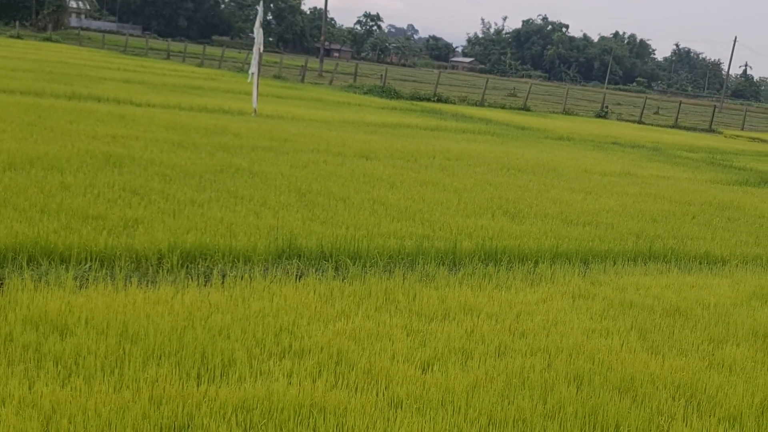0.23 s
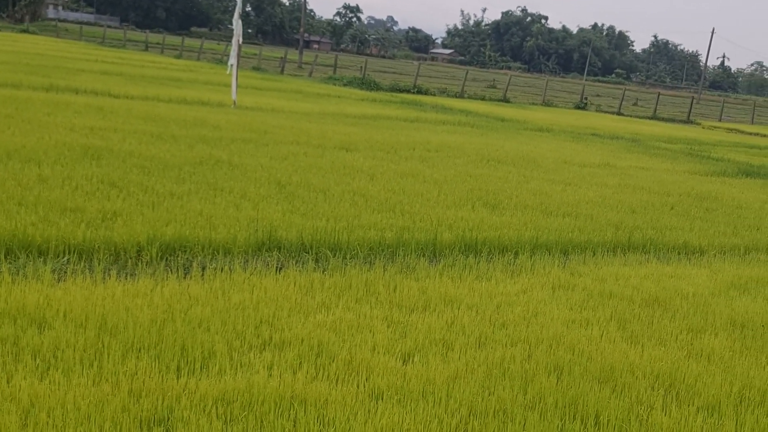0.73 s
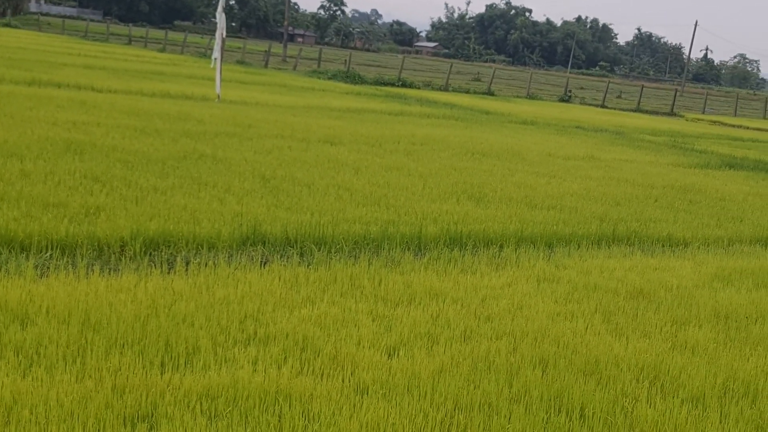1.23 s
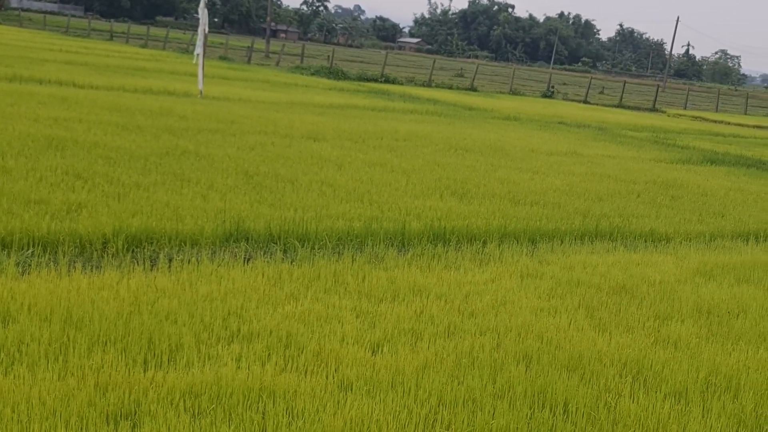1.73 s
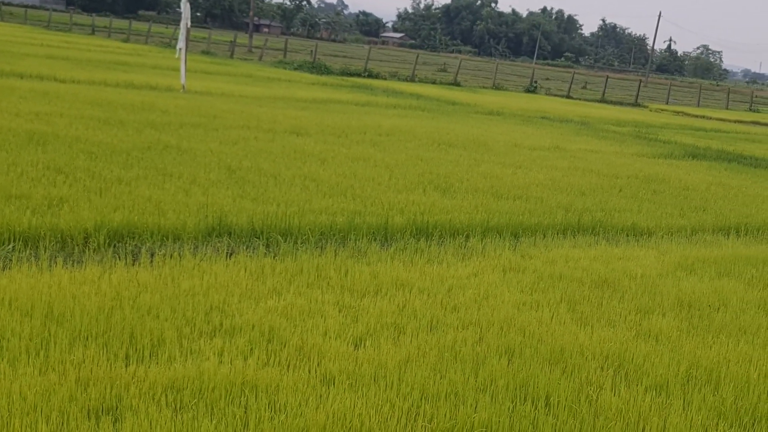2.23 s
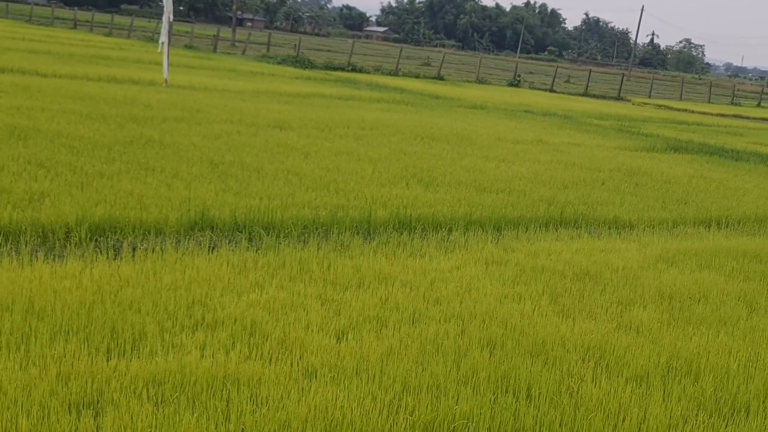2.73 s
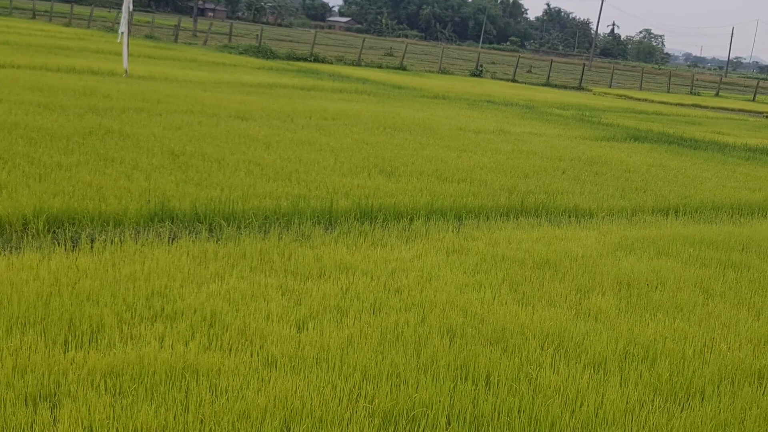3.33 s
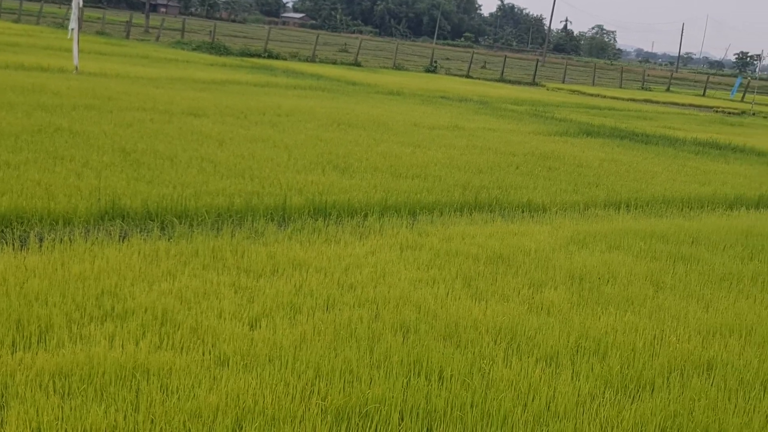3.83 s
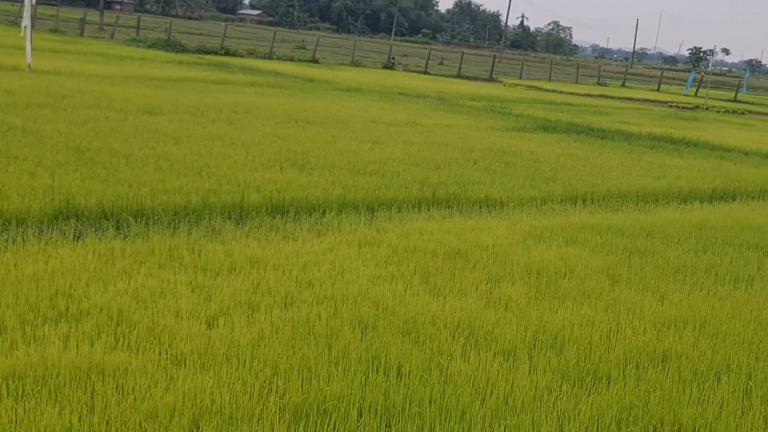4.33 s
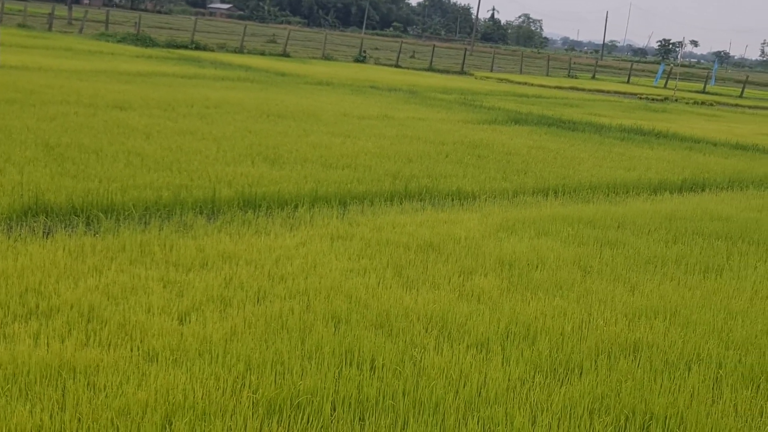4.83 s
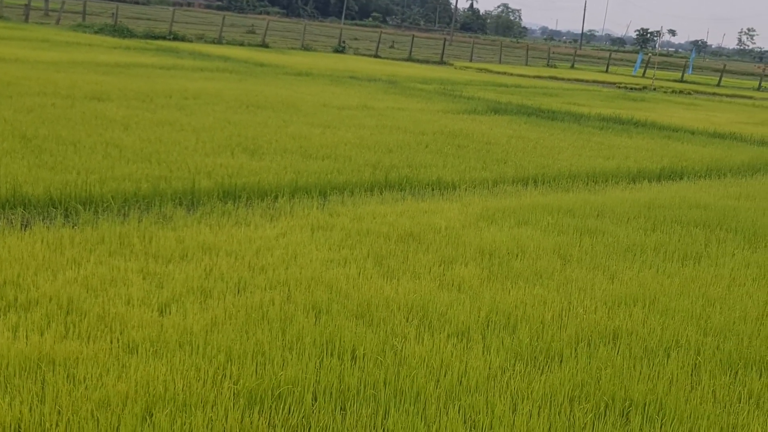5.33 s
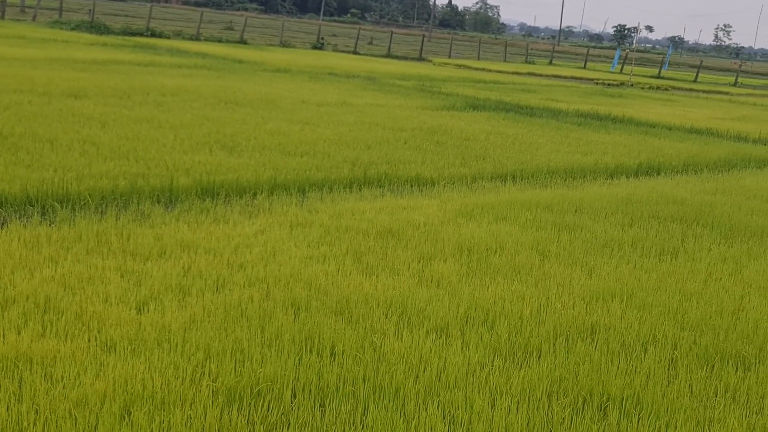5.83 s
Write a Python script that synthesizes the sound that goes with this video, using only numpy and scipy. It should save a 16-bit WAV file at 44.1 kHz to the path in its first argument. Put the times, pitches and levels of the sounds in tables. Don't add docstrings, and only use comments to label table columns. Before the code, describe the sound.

A calm outdoor rice field, with soft air rumble and faint hiss. Throughout, a far pump engine hums very low, wavering and stumbling briefly near 1.7 and 4.2 seconds. A dense distant cricket chorus trills steadily around a high, thin pitch, gently swelling. Closer bush-crickets scrape short, even higher buzzing phrases of about a sixth of a second, left and right, with faint ticking. A throaty bird gives quick rising calls at 0, 1.6, 3.3 and 4.8 seconds, each followed by softer falling notes; blurred echoes return from trees. Another bird adds an arching note at 4.5, with faint whistles near 0.8, 2.4 and 4.7, and faint far chatter between 2 and 4. Closest, the handheld casing creaks, snaps and ticks: clusters at 0.1-0.9, a few light ticks around 1.9 and 2.3, then dry crackles at 3.8-4.0, 4.4, a sharp one at 4.6, 5.07 and 5.7.

```python
import sys
import numpy as np
from scipy import signal
from scipy.fft import rfft, irfft, next_fast_len
from scipy.io import wavfile
from scipy.ndimage import uniform_filter1d, map_coordinates

SR = 44100
rng = np.random.default_rng(int(sys.argv[2]) if len(sys.argv) > 2 else 0)


def wav_out(sig):
    wavfile.write(sys.argv[1], SR, np.round(np.clip(np.atleast_2d(sig).T, -1, 1) * 32767).astype(np.int16))


def magnitude_from_level(level_db):
    exponent = np.asarray(level_db, float) / 20
    return 10 ** exponent


N = 268965

# frequency_hz, lead_rad
LEAD = [(50, .5), (110, .5), (350, -.2), (500, -.3), (800, -2.2), (1300, -2.9)]


def unit(x):
    return x / np.sqrt(np.mean(x ** 2) + 1e-20)


def along(points, hz):
    f, v = np.transpose(points)
    return np.interp(np.log(hz + 1), np.log(f + 1), v)


def curves(rows):
    s, *cols = np.transpose(rows)
    return [np.interp(np.arange(N) / SR, s, c) for c in cols]


def wobble(rate):
    knots = rng.standard_normal(N // 10)
    return map_coordinates(knots, [np.arange(N) * min(rate / SR, 0.09)], order=1)


def filtered(x, response):
    m = next_fast_len(N + 8192)
    return irfft(rfft(x, m) * response(np.fft.rfftfreq(m, 1 / SR)), m)[..., :N]


def sides(db):
    return np.array([magnitude_from_level(db / 2), magnitude_from_level(-db / 2)])


def late(x, samples):
    return np.array([x[0], np.roll(x[1], samples)])


def port_lead(x):
    return filtered(x, lambda hz: np.exp(0.5j * along(LEAD, hz) * [[1], [-1]]))


def echoes(x, decay, gap_s):
    hz, t, z = signal.stft(rng.standard_normal((2, SR // 2)), SR, nperseg=256)
    tail = signal.istft(z * magnitude_from_level(-60 * t / along(decay, hz)[:, None]), SR, nperseg=256)[1]
    tail = tail / np.linalg.norm(tail[0])
    delayed = np.pad(x, (int(gap_s * SR), 0))
    return signal.oaconvolve(delayed[None], tail, axes=1)[:, :N]


def rush(spectrum, patchy_db):
    # frequency_hz, likeness_0_to_1
    alike = [(60, .97), (400, .93), (700, .5), (1500, .3), (15000, .1)]
    z = signal.stft(rng.standard_normal((2, N)), nperseg=512)[2]
    patches = uniform_filter1d(rng.standard_normal(z.shape[1:]), size=6, axis=0)
    patches = uniform_filter1d(patches, size=14, axis=1)
    pair = signal.istft(z * magnitude_from_level(patchy_db * unit(patches)), nperseg=512)[1][:, :N]

    def mid_side(hz):
        turn = np.arccos(np.clip(along(alike, hz), -1, 1)) / 2
        return magnitude_from_level(along(spectrum, hz)) * [np.cos(turn), np.sin(turn)]

    mid, side = filtered(pair, mid_side)
    return unit(port_lead(np.array([mid + side, mid - side])))


def place(out, start_s, sound):
    out[:, round(start_s * SR):][:, :sound.shape[-1]] += sound


def air():
    # frequency_hz, level_db_per_hz
    low_spectrum = [(15, -36), (25, -4), (113, -12.5), (136, -20), (162, -22), (270, -35), (415, -37),
                    (484, -41), (648, -38), (1500, -38), (1950, -79), (3300, -120)]
    high_spectrum = [(710, -47), (1200, -20.5), (2230, -5), (3470, -20.5), (4200, -28.5), (4940, 1),
                     (5540, -2.5), (5870, -15), (6520, -17), (9030, -11), (9750, -14), (10900, -3.5),
                     (11800, -20.5), (15300, -28), (22000, -120)]
    # time_s, rumble_db, hiss_db
    levels = [(0.0, -50, -62.5), (6.1, -51, -62.5)]
    rumble_db, hiss_db = curves(levels)
    rumble = magnitude_from_level(rumble_db + 0.029 * wobble(14.0)) * rush(low_spectrum, patchy_db=1.0)
    hiss = filtered(rush(high_spectrum, patchy_db=1.5), lambda hz: 1 / (1 + (hz / 12000) ** 30))
    return (rumble + magnitude_from_level(hiss_db) * hiss) * sides(-1.14)[:, None]


def pump():
    # time_s, firing_hz, stumble_0_to_1
    running = [(0, 48.8, 0.02), (1.46, 48.48, 0), (1.56, 49.4, 0.5), (1.63, 50.6, 0.76), (1.7, 51, 0.93),
               (1.9, 52.7, 0.14), (2.22, 52.82, 0.12), (3.19, 53.91, 0.04), (3.4, 52.5, 0.26),
               (3.6, 52.55, 0.03), (4.08, 53.5, 0), (4.24, 51.6, 0.48), (4.5, 53.54, 0), (4.98, 52.98, 0.2),
               (6.1, 53.7, 0.15)]
    orders_db = [-48, -48, -73.5]
    stumble_db = [5.5, -14.5, 9.5]
    fade_db_per_s = [-1.17, -0.1, -0.1]
    hz, stumble = curves(running)
    t = np.arange(N) / SR
    phase = 2 * np.pi * np.cumsum(hz * (1 + 0.0047 * wobble(11))) / SR
    unsteady_db = [1.8 * wobble(4), 0.6 * wobble(6), 2.5 * wobble(5.7)]
    hum = np.zeros(N)
    for k in range(3):
        level_db = orders_db[k] + stumble_db[k] * stumble + fade_db_per_s[k] * t + 3.0 + unsteady_db[k]
        hum += magnitude_from_level(level_db) * np.sin((k + 1) * phase + k)
    return sides(-1.4)[:, None] * port_lead(hum)


def flock():
    # start_s, end_s, first_hz, last_hz, level_db
    chatter = [(1.965, 2.015, 3400, 3990, -63), (2.0, 2.12, 3100, 2800, -67),
               (2.349, 2.467, 3150, 2835, -65.5), (2.715, 2.826, 3120, 3050, -66),
               (2.906, 2.998, 3150, 3170, -68), (3.661, 3.909, 3020, 3280, -74)]
    song, rasp = np.zeros(N), wobble(250)
    for start, end, first_hz, last_hz, db in chatter:
        span = slice(int(start * SR), int(end * SR))
        hz = np.linspace(first_hz, last_hz, span.stop - span.start) * (1 + 0.06 * rasp[span])
        swell = signal.windows.tukey(len(hz), 0.3) * np.exp(-np.linspace(0, 0.8, len(hz)))
        song[span] += magnitude_from_level(db) * np.sin(2 * np.pi * np.cumsum(hz) / SR) * swell
    return echoes(song, [(3000, 0.27)], gap_s=0)


def table(t, *columns):
    return np.transpose(np.broadcast_arrays(t, *columns))


def rise(start, length, first_hz, last_hz, db, break_s, break_db):
    bend, break_up, leap_s = 1.3, 0.0997, 0.014
    attack_s, release_s = 0.031, 0.0031
    t = np.linspace(0, length, num=30)
    u, leapt = t / length, np.clip((t - break_s) / leap_s + 0.3, 0, 1)
    hz = (first_hz + (last_hz - first_hz) * u ** bend) * (1 + break_up * leapt)
    level = db - 3 * (1 - u) - 6 * np.clip(1 - t / attack_s, 0, 1)
    level = level - 12 * np.clip(1 - (length - t) / release_s, 0, 1)
    level = level - break_db * (1 - leapt) - 6 * np.sin(np.pi * leapt)
    marks = [0, break_s, length]
    lower_db = np.interp(t, marks, (-9, -7, -9))
    upper_db = np.interp(t, marks, (-22, -12, -17))
    return table(start + t, hz, level, lower_db, upper_db)


def fall(start, length, first_hz, last_hz, db):
    drop_s, sag_db_per_s = 0.011, -90
    t = np.linspace(0, length, num=12)
    hz = last_hz + (first_hz - last_hz) * np.exp(-t / drop_s)
    return table(start + t, hz, db + sag_db_per_s * t, -11, -10)


def held(start, length, first_hz, last_hz, db):
    u = np.linspace(0, 1, num=12)
    hz = first_hz + (last_hz - first_hz) * u ** 1.4
    return table(start + length * u, hz, db - 4 * (2 * u - 1) ** 2, -0.5, -19.5)


def whistle(start, length, first_hz, last_hz, db, bend):
    u = np.linspace(0, 1, num=12)
    hz = last_hz + (first_hz - last_hz) * (1 - u) ** bend
    return table(start + length * u, hz, db - 5 * (2 * u - 1) ** 4, -40, -40)


def notes(tables, jitter, flutter_db, spacing=0.15):
    third_line_db = -5
    song = np.zeros(N)
    flutter = [magnitude_from_level(flutter_db * wobble(80)) for _ in range(4)]
    waver = 1 + jitter * wobble(350)
    for note in tables:
        span = slice(int(note[0][0] * SR), int(note[-1][0] * SR))
        hz, db, lower_db, upper_db = (c[span] for c in curves(note))
        phase = 2 * np.pi * np.cumsum(hz * waver[span]) / SR
        lines = flutter[0][span] * np.sin(phase)
        lines += magnitude_from_level(lower_db) * flutter[1][span] * np.sin((1 - spacing) * phase)
        lines += magnitude_from_level(upper_db) * flutter[2][span] * np.sin((1 + spacing) * phase)
        lines += magnitude_from_level(lower_db + third_line_db) * flutter[3][span] * np.sin((1 - 2 * spacing) * phase)
        song[span] += magnitude_from_level(db) * lines * signal.windows.tukey(len(hz), 0.13)
    return song


def birds():
    # start_s, length_s, first_hz, last_hz, peak_db
    rising = [(0.01, 0.083, 1994, 2400, -56.5), (1.576, 0.09, 1820, 2443, -54.5),
              (3.278, .1, 2017, 2430, -52), (4.763, 0.093, 2064, 2466, -52)]
    falling = [(0.197, 0.049, 2276, 1842, -62), (.42, 0.03, 1900, 1850, -75),
               (1.848, 0.024, 2300, 2005, -66.5), (3.48, 0.0895, 2350, 1840, -57.5),
               (4.949, 0.031, 2090, 1870, -65)]
    level_notes = [(.234, 0.052, 1940, 1900, -64), (.358, 0.032, 1938, 1860, -71.5),
                   (1.865, 0.049, 2048, 1976, -63.5), (1.93, 0.034, 2020, 1970, -72),
                   (1.985, 0.069, 1950, 1810, -70), (4.978, 0.076, 1893, 1832, -66.5),
                   (5.104, .046, 2106, 1870, -71.5)]
    arch_low = [(4.522, 0.107, 2140, 2064, -68.5)]
    whistled = [
        (.792, .178, 3620, 2600, -69.5),
        (4.67, .09, 3030, 2343, -72),
        (2.368, .085, 4190, 4080, -75),
    ]
    # time_s, pitch_hz, level_db
    arch_path = [(4.505, 2427, -57), (4.525, 2910, -63.5), (4.553, 3010, -61.5), (4.581, 2476, -60.5),
                 (4.61, 2566, -64)]
    # centre_hz, width_hz, gain_db
    throat_modes = [(1850, 400, -2), (2120, 300, -1), (2600, 420, 2), (3050, 500, -5)]
    # frequency_hz, t60_s
    tree_decay = [(1000, 0.82), (2500, 0.63), (8000, 0.058)]
    leap_s = [0.058, 0.053, 0.047, 0.062]
    leap_db = [0.37, 6.3, 4.4, 7.9]
    bends = [1.45, 0.6, 1.5]

    rise_notes = [rise(*row, *leap) for row, *leap in zip(rising, leap_s, leap_db)]
    fall_notes = [fall(*row) for row in falling] + [held(*row) for row in level_notes]
    arch_notes = [table(*np.transpose(arch_path), -8, -28), fall(*arch_low[0])]
    whistle_notes = [whistle(*row, bend) for row, bend in zip(whistled, bends)]
    rises = notes(rise_notes, jitter=0.012, flutter_db=2.5, spacing=0.125)
    falls = notes(fall_notes, jitter=0.013, flutter_db=3.5, spacing=0.1)
    arch = notes(arch_notes, jitter=0.035, flutter_db=4, spacing=0.09)
    whistles = magnitude_from_level(4) * notes(whistle_notes, jitter=0.008, flutter_db=3.5)

    def throat(hz):
        return np.sqrt(sum(magnitude_from_level(2 * db) / (1 + ((hz - c) / w * 2) ** 2) for c, w, db in throat_modes))

    song = magnitude_from_level(8.5) * filtered(rises + falls, throat) + magnitude_from_level(6.5) * arch
    smear = 1 + 0.9 * filtered(rng.standard_normal((2, N)), lambda hz: 12 * np.exp(-hz / 190))
    answer = echoes(song, tree_decay, gap_s=0.006) * unit(smear)
    return late((song + whistles) * sides(1.5)[:, None], 18) + magnitude_from_level(-9) * answer


def strokes(wing_hz, width_hz, rate, duty, sweep, rough, octave_db=-60):
    cycle = np.cumsum(rate * (1 + 0.004 * wobble(8))) / SR + rng.random()
    u = np.clip(cycle % 1 / duty, 0, 1)
    tooth_hz = wing_hz * (1 + sweep * (0.5 - u) + rough * wobble(2500))
    phase = 2 * np.pi * np.cumsum(tooth_hz) / SR
    force = np.sin(np.pi * u) * magnitude_from_level(0.68 * wobble(rate))
    scrape = force * (np.sin(phase) + magnitude_from_level(octave_db) * np.sin(2 * phase))

    def wing(hz):
        return sum(1 / (1 + ((hz / k - wing_hz) / width_hz) ** 6) for k in (1, 2))

    return unit(filtered(scrape, wing))


def crowd():
    # time_s, level_db
    swells = [(0.0, -59.5), (0.59, -65.5), (1.17, -61), (1.63, -64.5), (2.05, -62), (2.9, -63.5),
              (3.4, -63), (3.75, -63.5), (4.28, -61.5), (4.43, -65), (4.79, -61.5), (5.64, -66), (6.1, -64)]
    # frequency_hz, level_db_per_hz
    wing_spectrum = [(2530, -21), (4300, -20.5), (4690, -11.5), (5050, -11), (5610, 0.5), (5870, -5),
                     (6060, -10.5), (6600, -21.5), (8580, -56), (14500, -120)]
    crickets_db, = curves(swells)
    trills = np.zeros((2, N))
    for hz, rate in [(5200, 85), (5500, 87), (5750, 77)]:
        one = strokes(hz, 630, rate, duty=0.54, sweep=0.068, rough=0.05)
        trills += echoes(one, [(5000, 0.096)], gap_s=0)
    trills = unit(filtered(trills, lambda hz: magnitude_from_level(along(wing_spectrum, hz) / 2)))
    wash = rush(wing_spectrum, patchy_db=1.4)
    crickets = unit(magnitude_from_level(-3.0) * trills + wash) * sides(-2.1)[:, None]
    far = strokes(10850, 300, 107, duty=0.9, sweep=0.03, rough=0.02)
    far = unit(echoes(far, [(9000, 0.047)], gap_s=0))
    return magnitude_from_level(crickets_db + 2.5) * crickets + magnitude_from_level(-78 + 2.1 * wobble(3.5)) * far


def singer(phrases, voice, lag, pan_db, turn_db=0., wet_db=-5, soft=0.75, swell_s=0.21):
    t, gain = np.arange(N) / SR, np.zeros(N)
    for start, end, db in phrases:
        swell = np.clip((t - start) / swell_s + soft, 0, 1)
        gain += magnitude_from_level(db) * swell * (t > start) * np.clip((end - t) / 0.0021, 0, 1)
    scattered = voice + magnitude_from_level(wet_db) * echoes(voice, [(8000, 0.021)], gap_s=0.0016)
    return gain * sides(pan_db + turn_db * t) * late(scattered, lag)


def bush_crickets():
    # start_s, end_s, level_db
    high_right = [(0.21, 0.354, -70), (0.42, 0.601, -70), (0.681, 0.864, -69), (0.965, 1.148, -69),
                  (1.259, 1.465, -69.5), (2.309, 2.416, -65.5), (2.514, 2.669, -66.5), (2.773, 2.918, -66),
                  (3.004, 3.182, -67), (3.322, 3.474, -65.5)]
    high_late = [(4.6, 4.695, -65), (4.82, 4.947, -64), (5.066, 5.234, -64.5), (5.321, 5.491, -64.5)]
    high_left = [(0.053, 0.18, -85), (0.577, 0.7, -92), (0.837, 0.973, -86), (1.123, 1.177, -74.5),
                 (1.257, 1.412, -76), (1.471, 1.65, -86), (1.719, 1.897, -80), (1.983, 2.148, -76),
                 (2.239, 2.413, -73.5), (3.003, 3.058, -76), (3.493, 3.612, -75), (3.734, 3.854, -73),
                 (3.946, 4.122, -79), (4.223, 4.401, -78), (4.477, 4.651, -73), (4.747, 4.923, -73),
                 (5.694, 5.84, -91), (5.973, 6.069, -77)]
    buzzer = [(0.353, 0.486, -79), (2.09, 2.233, -69), (2.401, 2.52, -68), (3.905, 4.065, -70),
              (4.258, 4.413, -70.5), (5.065, 5.202, -71), (5.313, 5.45, -71)]
    rasp_near = [(1.143, 1.281, -71.5), (2.853, 2.993, -70.5), (3.138, 3.283, -70.5), (4.861, 4.987, -70.5),
                 (5.077, 5.259, -72.5)]
    rasp_far = [(0.337, 0.497, -76.5), (0.546, 0.742, -78), (0.877, 1.008, -79), (2.643, 2.781, -75),
                (3.942, 4.169, -78), (4.577, 4.724, -79), (5.473, 5.586, -81), (5.798, 5.918, -80),
                (5.969, 6.038, -80)]
    ticker_left = [
        (0, 1.1, -82),
        (1.5, 3.1, -93),
    ]
    ticker_right = [
        (0, 3, -84),
        (3, 6.3, -91),
    ]
    # frequency_hz, left_minus_right_db
    buzzer_ports = [(6500, -21), (7250, -15.5), (8000, 20), (8600, 10), (13000, 5), (15000, 17)]

    voice = strokes(7530, 1000, 216, duty=0.6, sweep=0.34, rough=0.035, octave_db=-13.0)
    buzz = singer(buzzer, voice, lag=-10, pan_db=-8.5, turn_db=1.8, wet_db=-9)
    out = filtered(buzz, lambda hz: sides(along(buzzer_ports, hz)))

    voice = strokes(11200, 340, 105, duty=0.48, sweep=0.06, rough=0.009)
    out += singer(high_right, voice, lag=-30, pan_db=-16, turn_db=1.6, wet_db=-15, soft=0.3, swell_s=0.09)
    voice = strokes(10950, 480, 105, duty=0.55, sweep=0.1, rough=0.016)
    out += singer(high_late, voice, lag=-30, pan_db=-7, wet_db=-10)
    voice = strokes(10650, 350, 109.5, duty=0.5, sweep=0.06, rough=0.015)
    out += magnitude_from_level([[4], [-1]]) * singer(high_left, voice, lag=9, pan_db=0, wet_db=-10)

    voice = strokes(8350, 450, 211, duty=0.5, sweep=0.1, rough=0.03)
    out += singer(rasp_near, voice, lag=4, pan_db=10.5, wet_db=-10)
    voice = strokes(7950, 320, 200, duty=0.27, sweep=0.06, rough=0.02)
    out += singer(rasp_far, voice, lag=14, pan_db=12, turn_db=-0.4)

    voice = strokes(10000, 130, 58, duty=0.4, sweep=0.015, rough=0.005)
    out += singer(ticker_left, voice, lag=7, pan_db=6, wet_db=-12)
    voice = strokes(9300, 200, 60, duty=0.4, sweep=0.025, rough=0.008)
    out += singer(ticker_right, voice, lag=-5, pan_db=-7, turn_db=1, wet_db=-10)
    return out


def ticks():
    # start_s, peak_db, ring_hz, t60_s
    tick_rows = [(0.2942, -39.5, 2070, 0.017), (0.292, -47, 2500, 0.015), (0.4376, -54, 1810, 0.035),
                 (0.439, -56, 4250, 0.015), (3.806, -52, 1900, 0.039), (4.392, -50, 1850, 0.034),
                 (4.404, -54, 1900, 0.03), (0.4895, -44.5, 2480, 0.014), (1.848, -58, 2515, 0.017),
                 (1.930, -44.5, 2530, 0.03), (1.931, -47, 2180, 0.02), (1.931, -55, 2950, 0.015),
                 (2.314, -52.5, 2610, 0.032), (5.046, -45, 2568, 0.029)]
    out, t = np.zeros((2, N + SR)), np.arange(SR // 8) / SR
    for s, db, ring_hz, t60 in tick_rows:
        ring = np.sin(2 * np.pi * ring_hz * t) * (1 - np.exp(-t / 0.0012))
        place(out, s, magnitude_from_level(db - 60 * t / t60) * ring)
    return out[:, :N]


def creaks():
    # start_s, peak_db, low_db, middle_db, top_db
    creak_rows = [(0.066, -45.5, -26, -13, -6), (0.091, -46, -12, -4, 1), (0.209, -45, -9, -1, -14),
                  (0.218, -43, -6, -3, -2), (0.625, -52, -19, -15, -1), (0.764, -66.5, 10, -17, -12),
                  (0.8802, -46, 1, 3, -0.5), (3.804, -40.5, -13.5, -12, -6), (3.9612, -48.5, -4, 1, -1),
                  (3.969, -50.5, -2, 2, -12), (3.983, -54.5, 2.5, 4, -14), (4.385, -38.5, -15.5, -9, -5),
                  (4.403, -43, -15, -9, -10), (4.585, -38.5, -9.5, -2.5, -7), (5.069, -42, -8.5, 2, -12),
                  (5.08, -48.5, -3, 6.5, -3), (5.7012, -50.5, 3, 2, -10), (5.713, -48.5, 1.5, -1, -5)]
    # from_hz, to_hz
    bands = [(200, 450), (650, 1500), (1500, 3100), (3400, 8000), (8000, 15500)]
    # ring_hz, width_hz
    modes = [(950, 100), (1250, 67), (1850, 120), (2750, 150), (3700, 110), (4500, 1300), (6900, 10000),
             (8800, 150)]
    shares = (2.7, 0.99, 0.27, 0.048, 0.064)
    out, t = np.zeros((2, N + SR)), np.arange(SR // 8) / SR
    hz = np.fft.rfftfreq(len(t), 1 / SR)
    for s, db, low_db, middle_db, top_db in creak_rows:
        clumps = np.repeat(magnitude_from_level(3.5 * rng.standard_normal(len(t) // 32 + 1)), 32)[:len(t)]
        decay = magnitude_from_level(-60 * t / 0.026) + magnitude_from_level(-13 - 60 * t / 0.1)
        slips = rng.standard_normal((2, len(t))) * clumps * decay * (1 - np.exp(-t / 0.001))
        rings = 0.2
        for c, w in modes * (1 + 0.07 * rng.standard_normal((len(modes), 1))):
            rings = rings + magnitude_from_level(rng.normal(0, 3.5)) * 1j * hz * w / (c * c - hz * hz + 1j * hz * w)
        slips = irfft(rfft(slips) * rings, len(t))
        bands_db = (low_db + 0.5, low_db, middle_db, 0, top_db)
        for band, rel_db, shared in zip(bands, bands_db, shares):
            sos = signal.butter(4, band, "band", fs=SR, output="sos")
            part = signal.sosfilt(sos, slips + shared * slips[0])
            part = part / np.abs(part).max(axis=1, keepdims=True)
            place(out, s, magnitude_from_level(db + rel_db - 3.0) * sides(-1.2)[:, None] * part)
    return out[:, :N]


def snaps():
    # start_s, peak_db, ring_hz, t60_s
    snap_rows = [(0.209, -42, 6800, 0.0054), (0.2132, -36.5, 5960, 0.0076), (0.214, -54, 365, 0.01),
                 (0.215, -38, 2690, 0.0093), (0.2157, -37, 6930, 0.006), (0.2148, -48, 340, 0.012),
                 (0.219, -45, 2790, 0.007), (0.2192, -40, 5960, 0.008), (0.2212, -45, 12310, 0.002),
                 (0.2224, -39.5, 6520, 0.013), (0.2218, -37, 910, 0.0056), (0.2215, -43.5, 2700, 0.02),
                 (0.882, -41.5, 6900, 0.0083), (0.8817, -47, 417, 0.0083), (0.8813, -43, 5620, 0.005),
                 (0.8827, -45.5, 2050, 0.042), (0.883, -40, 2570, 0.007), (0.884, -41, 850, 0.0084),
                 (0.8855, -46, 415, 0.0073), (0.8873, -55.5, 373, 0.06), (0.8886, -44, 2530, 0.017),
                 (0.889, -53, 2020, 0.005), (0.8918, -52, 394, 0.012), (3.8067, -38.5, 4000, 0.0032),
                 (3.8113, -41, 3930, 0.0053), (3.9799, -36.5, 920, 0.0039), (4.385, -41, 6750, 0.006),
                 (4.3866, -39, 5080, 0.005), (4.3873, -34, 4225, 0.0049), (4.3886, -46, 13610, 0.003),
                 (4.3911, -43, 5410, 0.004), (4.3922, -45, 6880, 0.006), (4.5854, -28, 5730, 0.0017),
                 (4.5855, -44, 11850, 0.013), (4.5854, -39, 6700, 0.0044), (4.583, -57, 362.2, 0.017),
                 (4.5865, -58, 8900, 0.007), (4.5875, -38, 4300, 0.0042), (4.59, -48, 1080, 0.006),
                 (5.0736, -56, 3640, 0.0043), (5.0735, -38, 1130, 0.0081), (5.0752, -42, 2620, 0.0071),
                 (5.0776, -51, 354, 0.03), (5.7064, -37, 1020, 0.0077), (5.7067, -45, 2664, 0.014),
                 (5.7077, -49, 3990, 0.005), (5.712, -42.5, 2840, 0.016), (5.7208, -46, 2740, 0.012)]
    out, t = np.zeros((2, N + SR)), np.arange(SR // 16) / SR
    for (s, db, ring_hz, t60), (start, shift) in zip(snap_rows, rng.random((len(snap_rows), 2))):
        apart = 0.2 if ring_hz < 600 else 0.5 + 0.5 * shift
        turn = 2 * np.pi * start + np.array([[1], [-1]]) * apart
        ring = np.sin(2 * np.pi * ring_hz * t + turn) * (1 - np.exp(-t * 12 / t60))
        place(out, s, magnitude_from_level(db + 6.0 - 60 * t / t60) * sides(-2.5)[:, None] * ring)
    return out[:, :N]


def scene():
    far = air() + pump() + flock() + birds() + crowd()
    near = bush_crickets() + ticks() + creaks() + snaps()
    return far + near


def band_limit(x):
    return signal.sosfilt(signal.butter(12, 15890, fs=SR, output="sos"), x)


def record(dry):
    # frequency_hz, level_db_per_hz
    preamp = [(500, -20), (3000, 0), (12000, 0), (15800, -2)]
    heard = dry + magnitude_from_level(-77.0) * rush(preamp, patchy_db=-2.5)
    heard = filtered(heard, lambda hz: (hz < 15750) / (1 + (41 / (hz + 1)) ** 6))
    return band_limit(heard)


dry = scene()
out = record(dry)
wav_out(out)
```